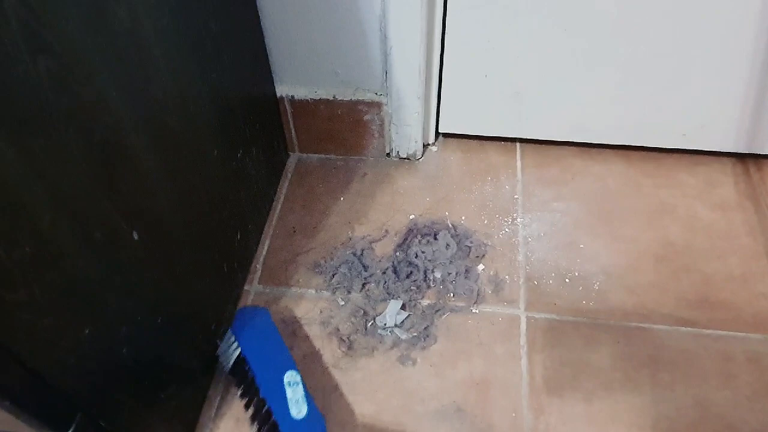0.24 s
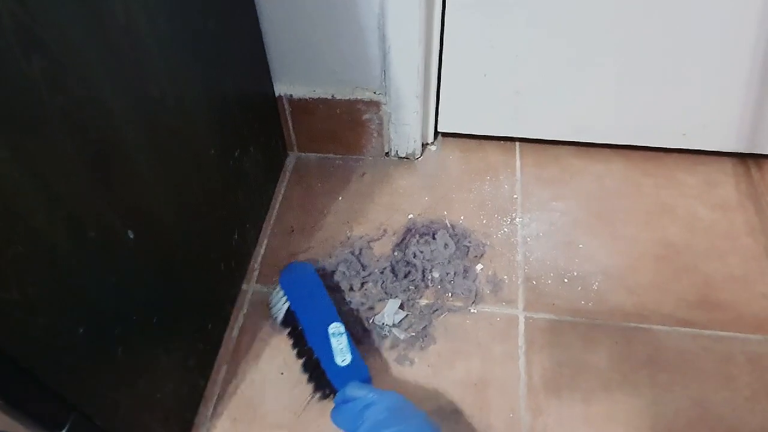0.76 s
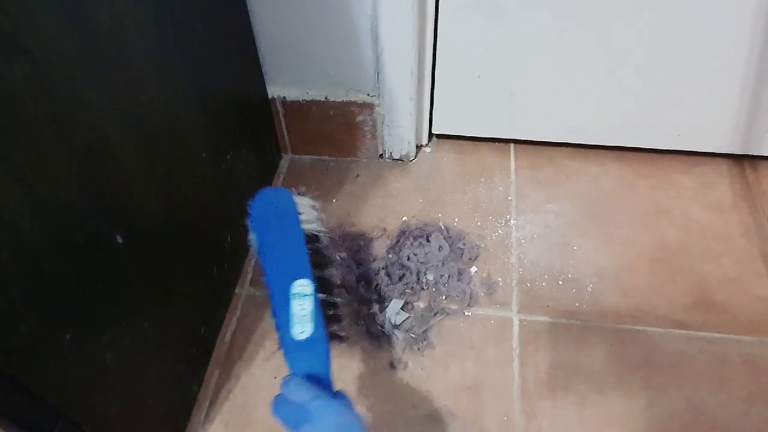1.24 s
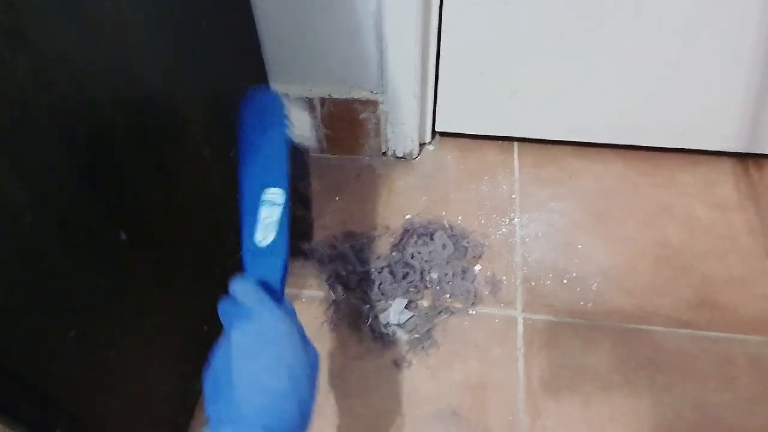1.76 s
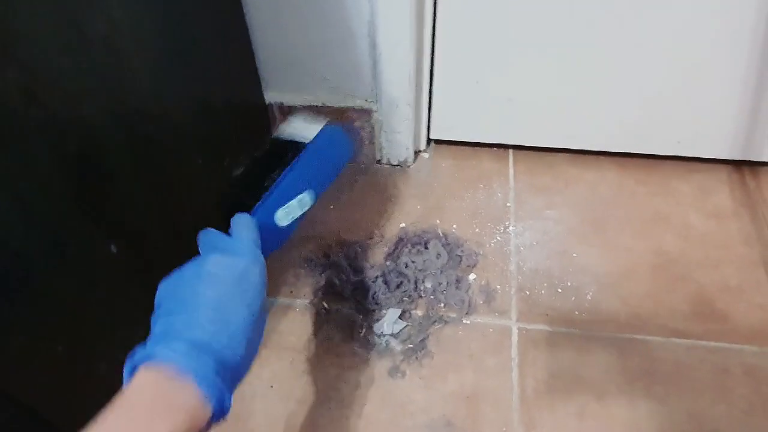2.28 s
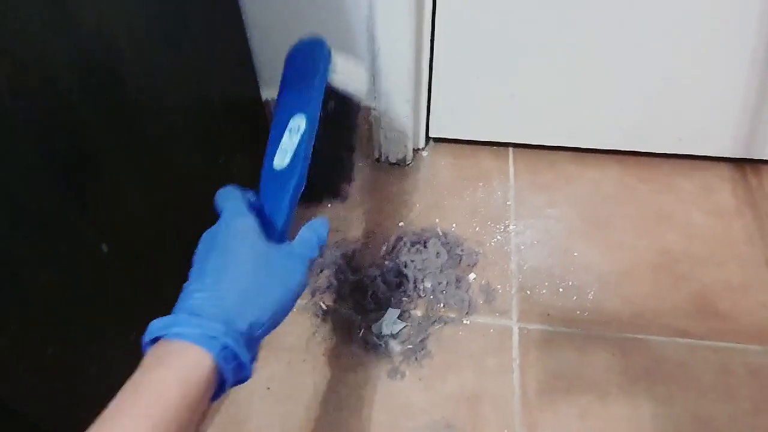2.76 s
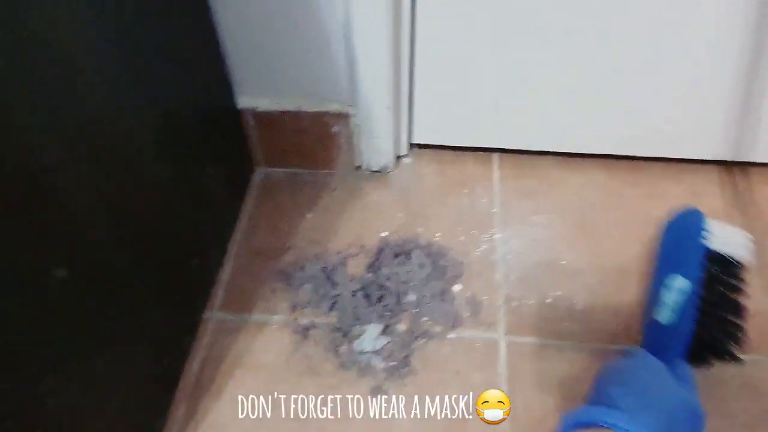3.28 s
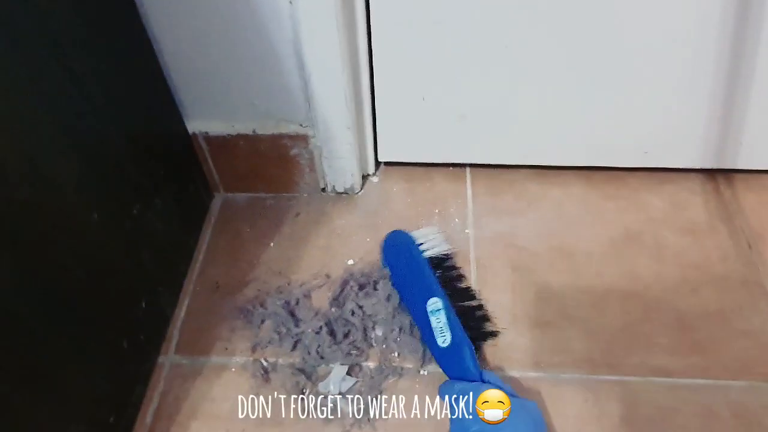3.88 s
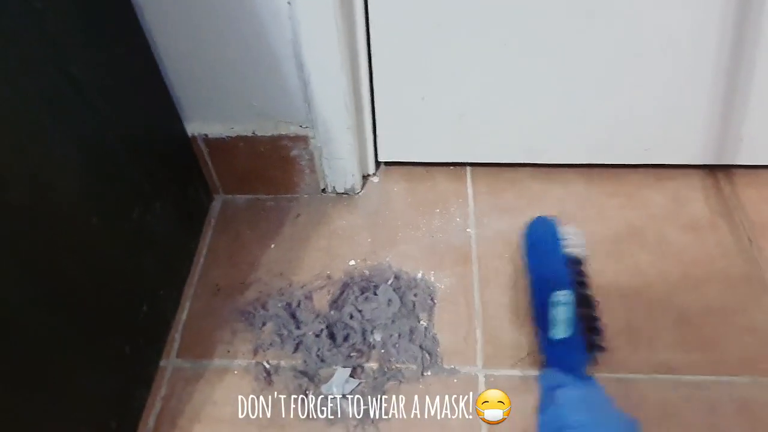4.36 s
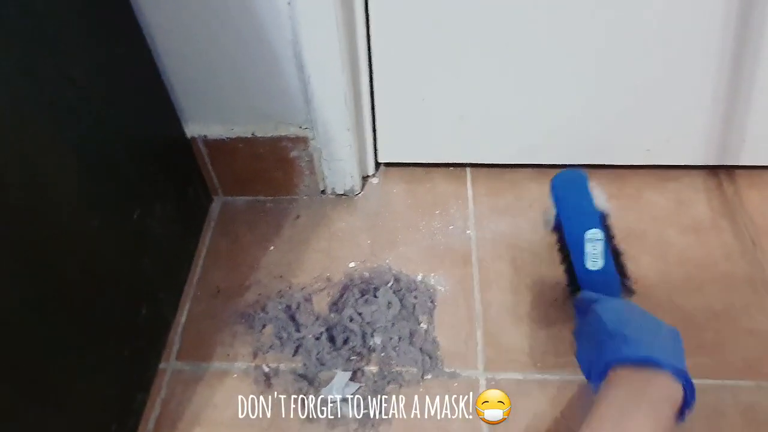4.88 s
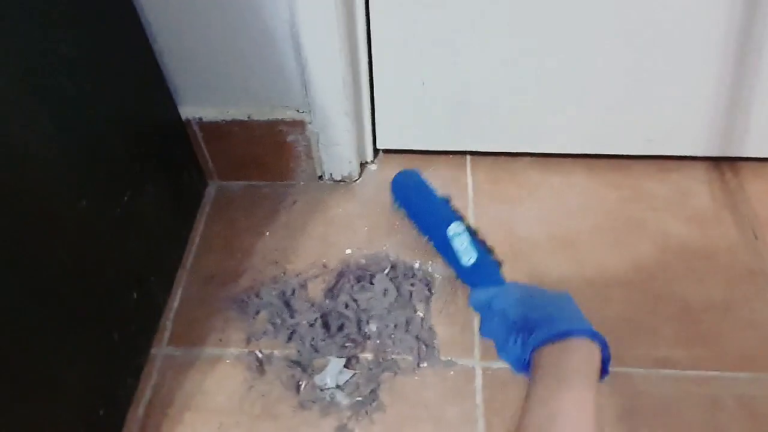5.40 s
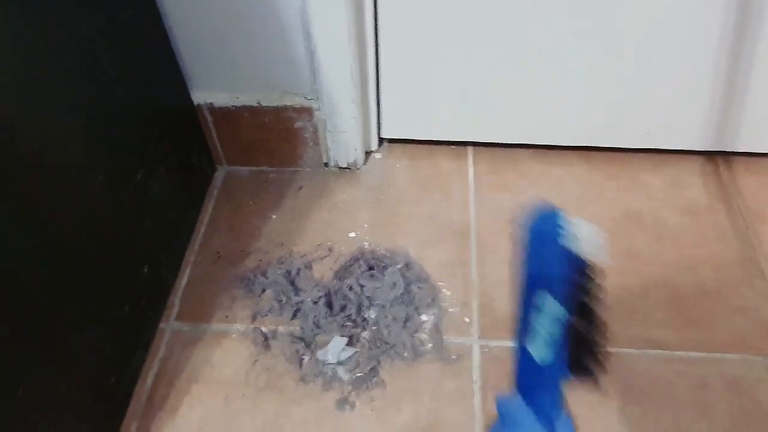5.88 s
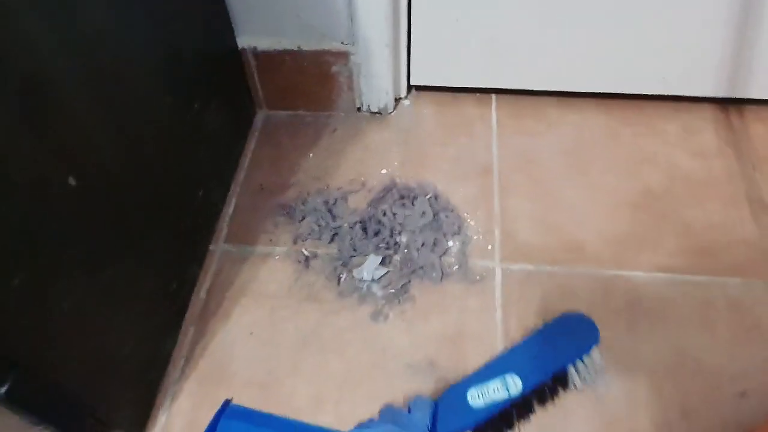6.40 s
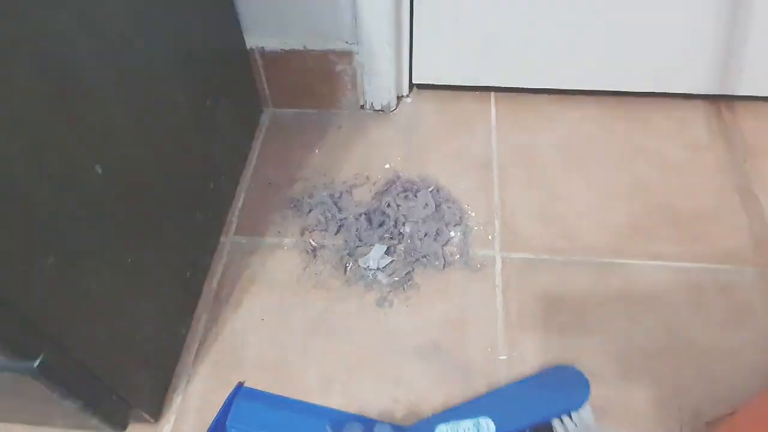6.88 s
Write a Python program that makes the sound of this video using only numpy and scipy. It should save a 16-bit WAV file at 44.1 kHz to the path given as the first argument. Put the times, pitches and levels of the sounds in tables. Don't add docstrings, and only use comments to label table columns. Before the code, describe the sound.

A stiff plastic brush scrapes and knocks on floor tiles, then a dustpan rattles in and thuds, over a steady throbbing machine hum.

```python
import sys
import numpy as np
from scipy import signal
from scipy.fft import rfft, irfft
from scipy.io import wavfile
from scipy.ndimage import uniform_filter1d

SR = 44100
rng = np.random.default_rng(int(sys.argv[2]) if len(sys.argv) > 2 else 0)


def pcm_store(signal):
    levels = np.round(np.clip(np.atleast_2d(signal), -1, 1) * 32767)
    wavfile.write(sys.argv[1], SR, levels.astype(np.int16).T)


def voltage_ratio(decibels):
    exponent = np.asarray(decibels, float) / 20
    return 10 ** exponent


N = 315182

# fastest_s, build_up_s, let_off_s, hiss_db, scrape_above_hiss_db
SWEEPS = [(0.63, 0.18, 0.11, -70, -5), (0.505, .15, .15, -77.5, 0), (3.36, 0.16, .25, -58.5, -4.5),
          (3.55, 0.34, 0.18, -55.5, -6.5), (3.61, 0.11, .1, -62.5, -6), (4.19, 0.2, 0.21, -59, -5.5),
          (4.855, .15, .12, -57, 3), (4.93, .16, 0.22, -58.5, -3.5), (5.13, .35, .35, -63.5, -4),
          (5.32, 0.33, .25, -62.5, -5.5), (4.27, 0.1, 0.073, -63, -8), (0.08, 0.34, .4, -78, 3),
          (0.27, .3, .3, -78.5, 3), (5.55, .2, 0.11, -73, -2)]
# landing_s, approach_s, settling_s, hiss_db, scrape_above_hiss_db
LANDINGS = [(2.591, .04, 0.21, -62, -19), (2.65, 0.075, .05, -65, -5), (2.71, .05, 0.26, -74, 3),
            (3.15, 0.19, .03, -70, -9), (3.171, 0.027, 0.075, -47, -4), (3.21, .03, 0.28, -59.5, -1),
            (4.047, 0.01, 0.16, -56, 5), (4.622, .03, .03, -72, -15), (4.637, .012, 0.022, -53, -8),
            (4.651, 0.024, .04, -55, -6), (4.665, 0.027, 0.33, -62.5, 3)]
# peak_s, build_up_s, let_off_s, hiss_db, scrape_above_hiss_db
TOUCHES = [(0.33, .35, 0.29, -79, 14), (1.24, .12, 0.23, -80, 8), (1.5, 0.65, 0.33, -84.5, 6.5),
           (1.74, 0.19, 0.1, -78.5, 6), (1.94, 0.23, 0.1, -86.5, 15), (2.08, 0.12, .15, -78.5, 5),
           (2.21, 0.088, .2, -78.5, 4), (2.44, 0.25, 0.24, -81.5, 10.5), (3.94, 0.1, 0.16, -76, -9),
           (2.0, .04, 0.038, -79, 7), (5.715, .2, 0.19, -74.5, 4), (5.86, 0.13, 0.12, -75, 6),
           (5.915, 0.059, 0.25, -71, 9), (6.0, .15, 0.26, -67.5, -9), (6.09, 0.37, 0.27, -66.5, -2.5)]
# peak_s, build_up_s, let_off_s, hiss_db, scrape_above_hiss_db
RUBS = [
    (6.43, 0.044, 0.11, -83.5, 22.5),
    (6.47, 0.072, .3, -75.5, 11),
    (6.6, 0.24, 0.14, -72, 7.5),
    (6.675, 0.055, 0.25, -63, -6),
    (6.746, 0.12, 0.19, -64, 5.5),
    (6.85, 0.14, 0.37, -69, -3),
    (7.0, 0.41, 0.48, -75.5, 3),
]
ROUNDNESS = [1.81, 1.04, 1.8, 1.55]
FIZZ_DB = [4.5, -11, -11, -15.]
# pitch_hz, density_db (per Hz)
BRISTLE_COLOUR = [(1180, -28), (2000, -4.5), (2640, 0), (2870, -2), (3120, 0), (5970, -3), (12100, -5.5),
                  (14000, -11), (15000, -10)]
# pitch_hz, density_db (per Hz)
SCRAPE_COLOUR = [(500, -18.5), (900, -4.5), (1300, -1), (2300, -7), (3200, -7), (5000, -44)]
# time_s, left_over_right_db
PLACE = [(0, -2.5), (1.2, -2.5), (2.5, -2.5), (2.6, 0.1), (3.1, -4), (3.3, -0.8), (4.3, -1.2), (4.66, -0.5),
         (4.9, 0), (5.4, -0.8), (5.8, -10), (6.07, -2.2), (6.9, 0.7), (7.13, -12)]
# start_s, end_s, pitch_hz, width_hz, level_db
SQUEAKS = [
    (3.255, 3.325, 7700, 300, -67),
    (5.835, 5.875, 2900, 220, -65),
    (1.2, 1.29, 4100, 1200, -73.5),
]
# start_s, peak_db, centre_hz
GRAINS = [(2.0632, -69, 3130), (2.4394, -66, 3000), (2.586, -49.5, 4290), (5.7432, -56, 3300),
          (5.769, -51, 6730), (5.7754, -62, 3070), (5.8311, -63, 3250), (6.468, -60, 3280),
          (6.5131, -59.5, 4230), (6.542, -54.5, 3380), (6.689, -55, 3000), (6.746, -53, 3000),
          (6.8, -49.5, 3070), (7.0422, -57, 3000), (7.058, -59, 3120), (7.1394, -44, 4960),
          (7.1434, -48, 3530)]
# start_s, peak_db, weaker_ring_hz, stronger_ring_hz, treble_crack_db
KNOCKS = [
    (2.589, -43, 1500, 4290, -18),
    (3.164, -46, 800, 2850, -16),
    (3.170, -41.5, 1600, 4370, -4),
    (3.183, -46, 1250, 3540, -7),
    (4.042, -36.5, 4450, 1400, -13),
    (4.044, -34, 2950, 2342, -14),
    (4.632, -45, 1133, 4900, -10),
    (4.633, -32.5, 2720, 2260, -16),
    (5.868, -38.5, 1286, 2700, -15),
    (5.898, -44, 2260, 1190, -18),
]
# start_s, peak_db, stronger_ring_hz
CLATTER = [
    (6.435, -58, 2510),
    (6.463, -49.5, 1150),
    (6.514, -50, 1120),
    (6.547, -42, 1700),
    (6.599, -51.5, 2330),
    (6.658, -56, 2720),
    (6.678, -55, 2300),
    (6.731, -45.5, 2790),
    (6.753, -53, 2890),
    (6.801, -49.5, 2330),
]
# pitch_hz, level_db, t60_s
BACK_MODES = [(690, -15, 0.022), (910, -18, 0.028), (1694, -12, 0.016), (2720, -11, 0.022),
              (3620, -12, 0.018), (4460, -15.5, 0.022), (5340, -13, 0.0081)]
# time_s, level_db
PAN_DRAG = [(6.401, -88), (6.45, -80), (6.55, -73), (6.641, -63.5), (6.74, -63.5), (6.82, -66.5),
            (6.95, -65.5), (7.03, -70), (7.08, -86)]
# pitch_hz, width_hz, level_db
PAN_RINGS = [(1100, 270, -1.5), (1660, 95, -1.5), (2330, 660, 6), (2826, 160, 0.5), (3920, 370, -3.5)]
# start_s, peak_db, pitch_hz, t60_s
THUDS = [
    (6.755, -35.5, 351, 0.04),
]
# time_s, hum_db, upper_pair_against_hum_db
LOAD = [(0, -57.5, 0), (.14, -41, -5), (.71, -45, -7.5), (.95, -47, -3), (1.6, -42.5, -11.5),
        (2.33, -41.5, -3.5), (2.75, -43, -12), (2.94, -45.5, 2), (3.12, -38, -8), (3.5, -43.5, -2),
        (4.24, -40, -3), (4.48, -43.5, -20), (4.97, -42, -0.5), (5.23, -38.5, -4.5), (6.07, -43, -8),
        (6.43, -45, 2.5), (6.7, -43, -17), (7.15, -50.5, -6)]
# time_s, level_db
AIR_LEVEL = [(0.0, -56), (3.02, -55.5), (3.38, -54), (6.41, -55), (7.03, -60.5), (7.15, -61.5)]
HUM_HZ = [58.8, 72.4, 85, 90.5, 360.3, 494.5]
HUM_DB = [-12, -2., -4, -4, -65, -75.5]
WAVER_DB = [2.5, 2.4, 2.6, 2.7, 1., 2.]
# pitch_hz, density_db (per Hz)
WASH_COLOUR = [(62, -31), (105, 1), (180, -2.5), (329, -19), (365, -9), (388, -12), (487, -16.5),
               (530, -19.5), (612, -20), (890, -33.5), (1760, -31.5), (2080, -36.5), (2780, -27.5),
               (3090, -49), (15000, -64.5)]
# pitch_hz, density_db (per Hz)
RUMBLE_COLOUR = [(25, -29.0), (45, -12.5), (60, -9.0), (110, -0.5)]
# pitch_hz, left_over_right_db
LEAN = [(100, -0.5), (300, -1.6), (600, -3), (2000, -5.5), (6000, -1.5)]
# pitch_hz, width_hz, level_db, left_over_right_db
CASING = [(49.5, 12, -69.5, 10), (73.7, 17.2, -51.5, -3), (86.4, 7.6, -65.5, -7.5), (132.1, 29, -62, -2),
          (299.5, 59, -64.5, 1.5), (358.3, 10.2, -74.5, 2), (607.7, 20, -80, 14.5), (1170, 360, -81, -15),
          (1700, 360, -81, -16), (2275, 56, -81, 4.5)]
# pitch_hz, likeness (1 = same)
LIKENESS = [(60, 0.77), (130, 1), (290, 0.91), (630, 0.42), (1400, 0.28), (3000, 0.57), (6600, 0.14)]
# pitch_hz, lead_rad
LEAD = [(60, -.12), (430, -.2), (1120, -1.5), (2330, -6), (2840, -6.2)]
# pitch_hz, density_db (per Hz)
HISS_COLOUR = [(2500, -18), (3300, 5.5), (5000, 0), (9000, -1), (14500, -8)]


def evened(x):
    return x / np.sqrt(np.mean(x ** 2) + 1e-20)


def read(points, hz):
    f, value = np.transpose(points)
    return np.interp(np.log(hz + 1), np.log(f + 1), value)


def columns(rows, t):
    s, *values = np.transpose(rows)
    return [np.interp(t, s, v) for v in values]


def sides(pan_db):
    return voltage_ratio(np.array([pan_db / 2, -pan_db / 2]))


def add(mix, s, sound):
    part = mix[:, round(s * SR):][:, :sound.shape[1]]
    part += sound[:, :part.shape[1]]


def resonate(x, hz, width):
    turn = np.exp(2j * np.pi * hz * np.arange(x.shape[-1]) / SR)
    r = np.exp(-np.pi * width / SR)
    low = signal.lfilter([(1 - r) ** 2], [1, -2 * r, r * r], x / turn)
    return 2 * (turn * low).real


def drift(per_s):
    return evened(signal.lfilter(*signal.butter(2, per_s, fs=SR), rng.standard_normal(N)))


def strokes(t):
    edge_db = -34.5
    fizz_per_db = 0.1
    hiss, fizz = 1e-10, 1e-10
    scrape = voltage_ratio(2 * -77.5)
    for rows, roundness, fizz_db in zip((SWEEPS, LANDINGS, TOUCHES, RUBS), ROUNDNESS, FIZZ_DB):
        for s, rise, fall, db, press_db in rows:
            away = np.where(t < s, (s - t) / rise, (t - s) / fall)
            power = voltage_ratio(2 * (db + edge_db * away ** roundness))
            hiss = hiss + power
            scrape = scrape + power * voltage_ratio(2 * press_db)
            fizz = fizz + power * voltage_ratio(2 * (fizz_db + fizz_per_db * (db + 66)))
    return 10 * np.log10([hiss, scrape, fizz / hiss])


def bristles(flicks_per_s=9000, patchy_db=-0.5):
    flicks = rng.standard_normal((2, N)) * (rng.random((2, N)) < flicks_per_s / SR)
    hz, t, z = signal.stft(evened(flicks), SR, nperseg=256, noverlap=192)
    hiss_db, scrape_db, fizz_db = strokes(t)
    pan_db, = columns(PLACE, t)
    high = np.clip(np.log((hz + 1) / 6500) / 1.8, 0, 1)[:, None]
    patches = uniform_filter1d(rng.standard_normal(z.shape[1:]), 4, 0)
    patches = evened(uniform_filter1d(patches, 25, 1))
    hiss_gain = voltage_ratio(read(BRISTLE_COLOUR, hz)[:, None] + high * (fizz_db - 2.5) + hiss_db + 10.5)
    scrape_gain = voltage_ratio(read(SCRAPE_COLOUR, hz)[:, None] + scrape_db + 13.5)
    z = z * np.hypot(hiss_gain, scrape_gain) * voltage_ratio(patchy_db * patches)
    z = z * sides(np.clip(pan_db, -9, 9))[:, None]
    return signal.istft(z, SR, nperseg=256, noverlap=192)[1][:, :N]


def knocks():
    cushion_s, ring_t60_s = 0.0015, 0.013
    out, t = np.zeros((2, N)), np.arange(3500) / SR
    hits = list(KNOCKS) + [(s, db, 2294, hz, -20) for s, db, hz in CLATTER]
    treble = signal.butter(2, [4000, 13000], "bandpass", fs=SR)
    back = sum(voltage_ratio(db - 2.5 - 60 * t / t60) * np.sin(2 * np.pi * hz * t) for hz, db, t60 in BACK_MODES)
    for s, db, weaker_hz, stronger_hz, treble_db in hits:
        tufts = rng.standard_normal((2, 3500)) * np.minimum(t / cushion_s, 1) * np.exp(-t / 0.005)
        pair = voltage_ratio(-4.5) * np.sin(2 * np.pi * weaker_hz * t) + np.sin(2 * np.pi * stronger_hz * t)
        body = (voltage_ratio(-60 * t / ring_t60_s) * pair + back) * (1 - np.exp(-t / cushion_s))
        blows = 0.2 * tufts + (t == 0)
        ring = signal.fftconvolve(blows, body[None], axes=1)[:, :3500]
        crack = signal.lfilter(*treble, tufts)
        sound = ring / abs(ring).max() + voltage_ratio(treble_db) * crack / abs(crack).max()
        add(out, s, voltage_ratio(db) * sides(-4.5)[:, None] * sound)
    return out


def grit():
    out, t = np.zeros((2, N)), np.arange(600) / SR
    for s, db, hz in GRAINS:
        band = signal.butter(2, [hz * 0.55, min(hz * 1.5, 14e3)], "bandpass", fs=SR)
        snap = signal.lfilter(*band, rng.standard_normal(600)) * np.exp(-t / 0.0008)
        pan_db, = columns(PLACE, s)
        add(out, s, sides(pan_db)[:, None] * voltage_ratio(db + 5.5) * snap / abs(snap).max())
    return out


def squeak():
    out = np.zeros((2, N))
    for start, end, hz, width, db in SQUEAKS:
        t = np.arange(start, end, 1 / SR)
        band = evened(resonate(rng.standard_normal((2, 6000)), hz, width))[:, :len(t)]
        add(out, start, voltage_ratio(db) * band * signal.windows.tukey(len(t), 0.6))
    return out


def dustpan(slips_per_s=400, spread_db=3.5):
    out = np.zeros((2, N))
    s, db = np.transpose(PAN_DRAG)
    t = np.arange(s[0], s[-1], 1 / SR)
    size = voltage_ratio(spread_db * np.minimum(rng.exponential(1, SR), 4)) * (rng.random(SR) < slips_per_s / SR)
    slips = size * rng.standard_normal((2, SR)) + 0.1 * rng.standard_normal((2, SR))
    rings = sum(voltage_ratio(ring_db) * evened(resonate(slips, hz, width)) for hz, width, ring_db in PAN_RINGS)
    add(out, s[0], voltage_ratio(np.interp(t, s, db)) * evened(rings)[:, :len(t)] * sides(-6.5)[:, None])
    t = np.arange(3500) / SR
    for s, db, hz, t60 in THUDS:
        thud = np.sin(2 * np.pi * hz * t) + 0.7 * np.sin(2 * np.pi * 1.2 * hz * t)
        swell = np.minimum(t / 0.0039, 1)
        add(out, s, voltage_ratio(db - 60 * t / t60) * swell * thud * np.ones((2, 1)))
    return out


def corner(x, t60, wet_db):
    t = np.arange(8000) / SR
    taps = rng.choice([-1., 1.], (2, 8000)) * (rng.random((2, 8000)) < 2000 / SR)
    taps = taps * (t > 60 / SR)
    taps = signal.lfilter([0.6], [1, -0.4], taps * voltage_ratio(-60 * t / t60))
    tail = voltage_ratio(wet_db) * taps / np.linalg.norm(taps, axis=1, keepdims=True)
    return x + signal.fftconvolve(x, tail, axes=1)[:, :N]


def machine():
    air_db, = columns(AIR_LEVEL, np.arange(N) / SR)
    return hum() + voltage_ratio(air_db - np.median(air_db)) * (wash() + casing() + whine())


def hum():
    t, out = np.arange(N) / SR, np.zeros((2, N))
    load_db, upper_db = columns(LOAD, t)
    air_db, = columns(AIR_LEVEL, t)
    main_db = load_db + 10 * np.log10(np.clip(1 - voltage_ratio(2 * upper_db), 0.05, 1))
    pair_db = load_db + upper_db
    tone_db = air_db - np.median(air_db)
    follow = [load_db, main_db, pair_db, pair_db, tone_db, tone_db]
    for hz, db, slow_db, waver_db in zip(HUM_HZ, HUM_DB, follow, WAVER_DB):
        turn = 2 * np.pi * (hz * t + rng.random()) + 0.5 * drift(4.2)
        level = voltage_ratio(db + slow_db + waver_db * drift(2.5))
        out += np.sqrt(2) * level * np.sin(turn + [[0], [-read(LEAD, hz)]])
    return out * sides(-1.1)[:, None]


def wash():
    frames, hz = N // 512 + 5, np.fft.rfftfreq(2048, 1 / SR)
    a, b, c, d, patches = rng.standard_normal((frames, 1025, 5)).T
    patches = evened(uniform_filter1d(uniform_filter1d(patches, 16, 0), 6, 1))
    same = np.clip(read(LIKENESS, hz), -1, 1)[:, None]
    left = a + 1j * b
    late = np.exp(-1j * read(LEAD, hz))[:, None]
    right = same * left * late + np.sqrt(1 - same ** 2) * (c + 1j * d)
    shape_db = np.where(hz < 110, read(RUMBLE_COLOUR, hz), read(WASH_COLOUR, hz))
    z = np.array([left, right]) * voltage_ratio(shape_db[:, None] + 1.46 * patches)
    z = z * sides(read(LEAN, hz))[..., None]
    return voltage_ratio(-52.5) * evened(signal.istft(z, nperseg=2048, noverlap=1536)[1][:, :N])


def casing():
    noise, out = rng.standard_normal((2, N)), np.zeros((2, N))
    for hz, width, db, pan_db in CASING:
        same = np.clip(read(LIKENESS, hz), -1, 1)
        pair = np.array([noise[0], same * noise[0] + np.sqrt(1 - same ** 2) * noise[1]])
        out += voltage_ratio(db) * sides(pan_db)[:, None] * evened(resonate(pair, hz, width))
    return out


def whine():
    band = evened(resonate(rng.standard_normal((2, N)), 2754, 100))
    return voltage_ratio(-75.5 + 1.6 * drift(6.6)) * sides(-5.0)[:, None] * band


def hiss():
    hz = np.fft.rfftfreq(N, 1 / SR)
    spectrum = rfft(rng.standard_normal((2, N))) * voltage_ratio(read(HISS_COLOUR, hz))
    return voltage_ratio(-85.5) * evened(irfft(spectrum, N))


def scene():
    strokes_heard = corner(bristles() + grit(), t60=0.14, wet_db=-11.5)
    hits = corner(knocks() + dustpan(), t60=0.15, wet_db=-7)
    return strokes_heard + hits + squeak() + machine() + hiss()


def roll_off(x):
    return signal.sosfilt(signal.butter(12, 15100, fs=SR, output="sos"), x)


def record(dry):
    lowpass = signal.firwin(511, 14550, window=("kaiser", 9), fs=SR)
    limited = signal.oaconvolve(dry, lowpass[None], "same")
    return roll_off(limited)


dry = scene()
out = record(dry)
pcm_store(out)
```